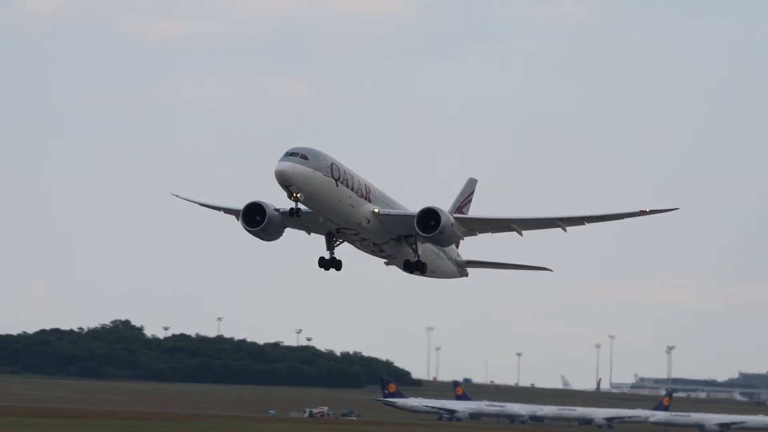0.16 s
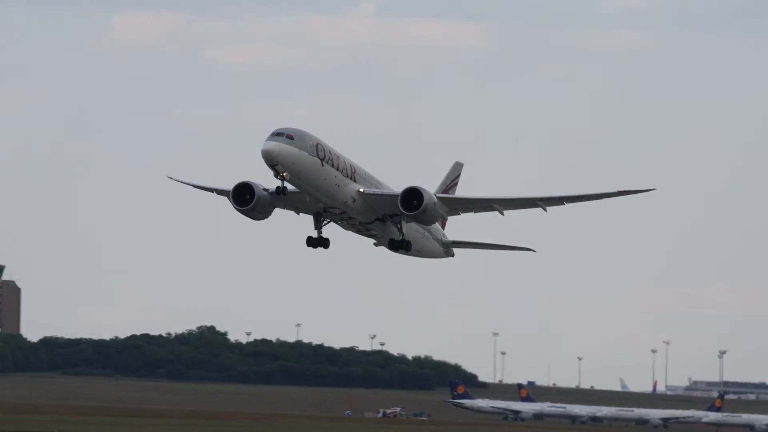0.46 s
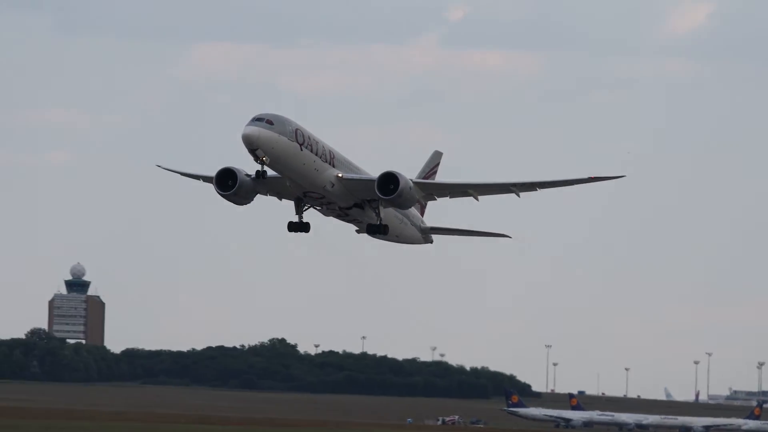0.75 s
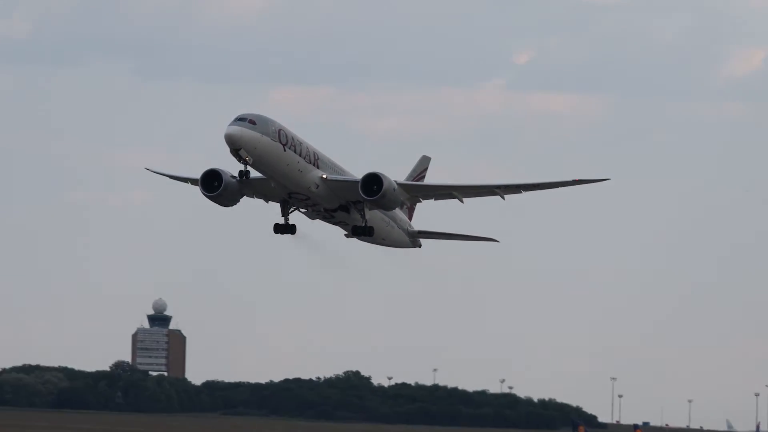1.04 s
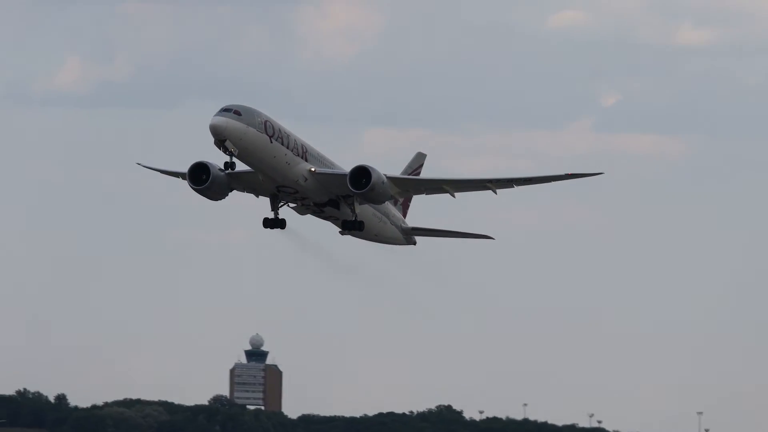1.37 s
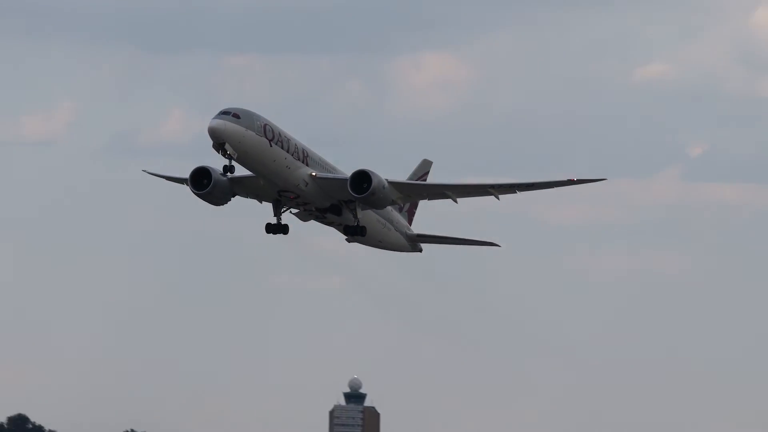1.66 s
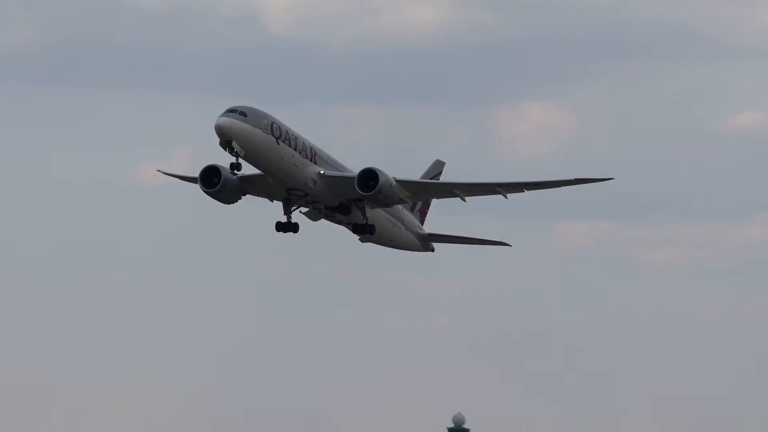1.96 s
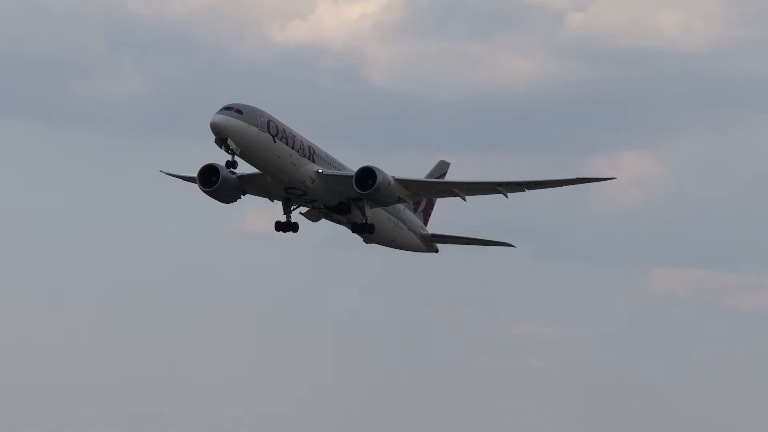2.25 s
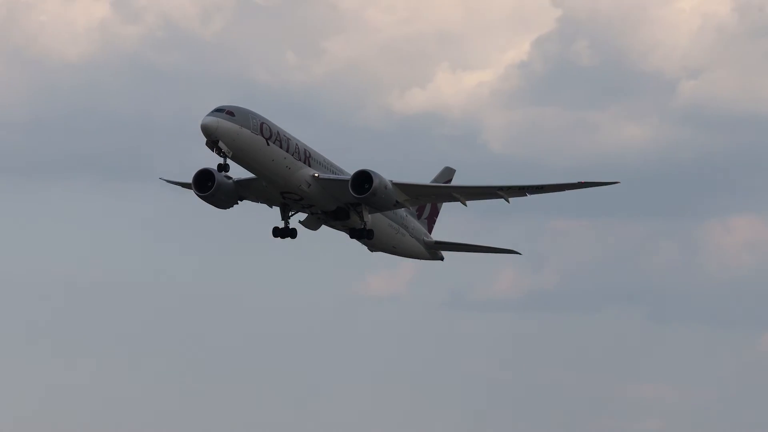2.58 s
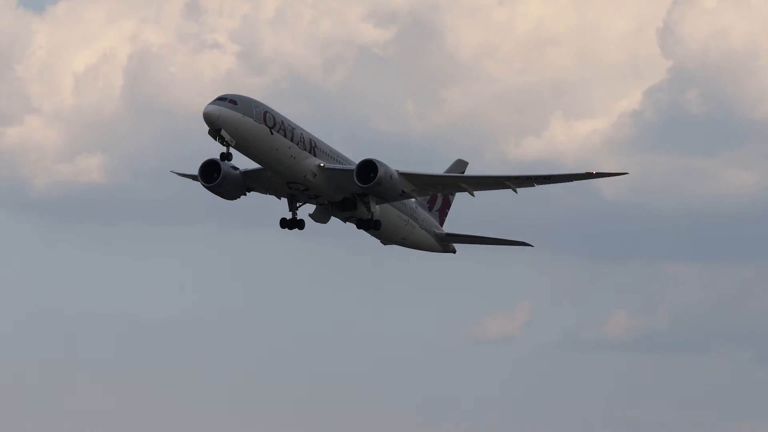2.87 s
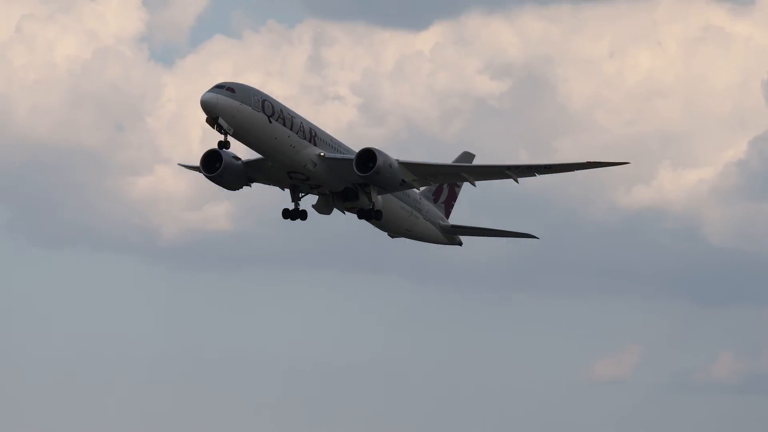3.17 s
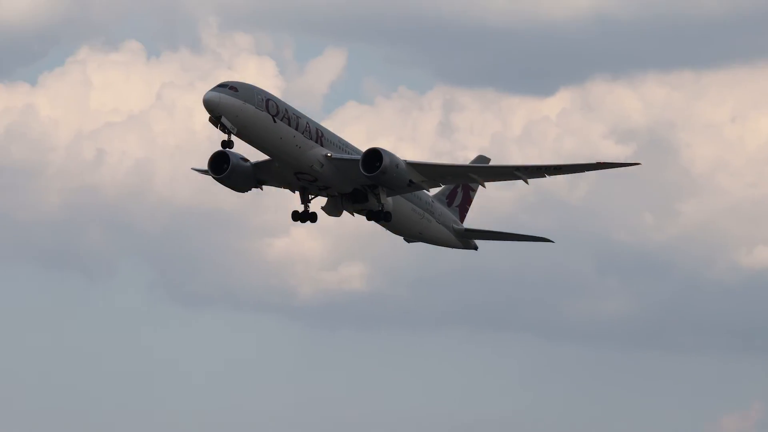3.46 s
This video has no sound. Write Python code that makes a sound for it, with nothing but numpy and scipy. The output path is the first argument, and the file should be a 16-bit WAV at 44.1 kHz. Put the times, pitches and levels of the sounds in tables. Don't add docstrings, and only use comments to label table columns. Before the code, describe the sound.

A jet airliner's deep rumble grows into a loud rushing roar and engine whine over field crickets

```python
import sys
import numpy as np
from scipy import signal
from scipy.fft import rfft, irfft
from scipy.io import wavfile

SR = 44100
rng = np.random.default_rng(int(sys.argv[2]) if len(sys.argv) > 2 else 0)


def wrap_up_sound(samples):
    columns = np.atleast_2d(samples).T
    tamed = np.clip(columns, -1, 1)
    steps = np.round(tamed * 32767).astype(np.int16)
    wavfile.write(sys.argv[1], SR, steps)


def decibels_to_gain(level_db):
    exponent = np.asarray(level_db, float) / 20
    return 10 ** exponent


N = 159642
TIME = np.arange(N) / SR
HZ = np.maximum(np.fft.rfftfreq(N, 1 / SR), 1)
SIDES = np.array([[1], [-1]])


def rms_one(x):
    return x / np.sqrt(np.mean(x ** 2) + 1e-20)


def in_time(rows):
    seconds, *columns = np.transpose(rows)
    return [np.interp(TIME, seconds, column) for column in columns]


def at_hz(points, hz, outside=None):
    f, value = np.transpose(points)
    return np.interp(np.log(hz), np.log(f), value, left=outside, right=outside)


def drift(rate):
    step = 40
    pole = np.exp(-2 * np.pi * rate * step / SR)
    noise = rng.standard_normal(N // step + 2002)
    slow = signal.lfilter([1], [1, -2 * pole, pole * pole], noise)[2000:]
    return np.interp(np.arange(N) / step, np.arange(len(slow)), rms_one(slow))


def coloured(spectrum, patchy_db, channels):
    shaped = rfft(rng.standard_normal((channels, N))) * decibels_to_gain(at_hz(spectrum, HZ, outside=-150))
    half_octave = 2 * np.log2(HZ / 16)
    first, last = [int(np.log2(spectrum[i][0] ** 2 / 256)) for i in (0, -1)]
    together = drift(2.0)
    out = 0
    for k in range(first, last + 2):
        band = np.clip(1 - abs(half_octave - k), 0, 1)
        flicker_db = patchy_db * (.5 * together + drift(2.9))
        out = out + irfft(shaped * band, N) * decibels_to_gain(flicker_db)
    return rms_one(out)


def airliner():
    return exhaust_rumble() + shaft_beat() + far_roar() + inlet_roar() + blade_tones()


# time in seconds, jet roar in dB, fan rush in dB.
INLET_SWELL = [(0, -63.5, -62), (1.2, -45.5, -52.5), (1.7, -40.5, -44), (2.1, -29.5, -38), (2.4, -30, -33),
               (2.65, -24, -27.5), (2.82, -21.5, -29.5), (2.95, -19.5, -28), (3.25, -17, -25.5),
               (3.45, -17.5, -24.5), (3.62, -20.5, -21.5)]
# frequency in Hz, density in dB per Hz.
JET_COLOUR = [(150, -11.5), (300, 4.5), (450, -3.5), (1000, -7.5), (1600, -9.5), (2500, -21), (4000, -63.5)]
# frequency in Hz, density in dB per Hz.
FAN_COLOUR = [(600, -38.5), (1200, 5), (1800, -6), (2600, -1.5), (3500, -7.5), (4300, -13.5), (5200, -23),
              (6800, -48)]


def inlet_roar():
    jet_db, rush_db = in_time(INLET_SWELL)
    jet = decibels_to_gain(jet_db) * coloured(JET_COLOUR, patchy_db=0.3, channels=2)
    rush = decibels_to_gain(rush_db) * coloured(FAN_COLOUR, patchy_db=0.3, channels=2)
    direct, scattered = jet + rush
    return microphones(direct, scattered, lag_us=47.6, echo_ms=1.88, echo_gain=.65)


# time in seconds, frequency in Hz.
BLADE_PASSING = [
    (0, 851),
    (1.7, 849),
    (2.3, 846),
    (2.7, 841),
    (3.2, 839.5),
    (3.62, 836.5),
]
# time in seconds, blade tone in dB, swell of the upper tones in dB.
TONE_SWELL = [(0, -46, -33), (.7, -43, -33), (1.3, -48, -34), (1.9, -45, -27), (2.2, -45, -17),
              (2.45, -43, -9), (2.68, -36, -10), (2.84, -35, -13), (2.93, -27, -7), (3.4, -23, 0),
              (3.62, -21, -2)]
# multiple of the blade rate, level at the loudest in dB,
# share of the swell followed, twinkle in dB.
UPPER_TONES = [(2, -28, .8, 4), (3, -36, .65, 4), (4, -39, .9, 4), (5, -46, .95, 4), (6, -66, .9, 4),
               (1.771, -32, .65, 4), (1.378, -35, .75, 4), (.757, -35, .8, 4), (.858, -38, .6, 4),
               (2.308, -43, .7, 4), (2.612, -43, .7, 4), (4.104, -48, .6, 4), (5.116, -49, .95, 4),
               (6.116, -57, 1.1, 4)]


def rotor_phase():
    return 2 * np.pi * np.cumsum(in_time(BLADE_PASSING)[0]) / SR


def blade_tones():
    turns = rotor_phase()
    blade_db, swell_db = in_time(TONE_SWELL)
    blur = 1 - .03 * swell_db
    tones = [(1, blade_db - 1, 2.8)]
    for multiple, db, share, twinkle_db in UPPER_TONES:
        tones.append((multiple, db + share * swell_db, twinkle_db))
    whine = 0
    for multiple, db, twinkle_db in tones:
        level_db = db + twinkle_db * np.sqrt(blur) * drift(4 * multiple)
        wander_rad = .36 * blur * multiple * drift(5)
        whine = whine + decibels_to_gain(level_db) * np.sqrt(2) * np.sin(multiple * turns + wander_rad)
    return microphones(whine, 0 * whine, lag_us=47.6, echo_ms=1.88, echo_gain=0)


# shaft order, level in dB.
SHAFT_ORDERS = [(1, -29.5), (2, -30), (3, -34.5), (4, -45.5)]


def shaft_beat():
    blades, fade_s = 18, 3.54
    turns = rotor_phase() / blades
    beat = 0
    for order, db in SHAFT_ORDERS:
        level = decibels_to_gain(db + 1.2 * drift(3.0)) * np.sqrt(2)
        beat = beat + level * np.sin(order * turns + 1.57 * drift(2.87))
    return beat / (1 + (TIME / fade_s) ** 8)


# time in seconds, level in dB.
RUMBLE_SWELL = [
    (0.0, -23),
    (1.3, -19),
    (1.67, -26.5),
    (1.74, -19),
    (2.71, -18),
    (3.21, -14),
    (3.25, -25),
    (3.42, -15.5),
    (3.62, -21),
]
# frequency in Hz, density in dB per Hz.
RUMBLE_COLOUR = [(11, -44), (18, -14), (43, -0.5), (86, 0), (146, -9.5), (168, -13), (240, -32),
                 (310, -57.5), (530, -120)]


def exhaust_rumble():
    level_db = in_time(RUMBLE_SWELL)[0] - 1.5
    return decibels_to_gain(level_db) * coloured(RUMBLE_COLOUR, patchy_db=0.05, channels=1)


# frequency in Hz, density in dB per Hz.
FAR_COLOUR = [(150, -14.5), (200, 1), (400, -0.5), (1100, -5.5), (2500, -12), (4000, -20), (6000, -28.5),
              (7500, -68.5)]


def far_roar():
    direct, scattered = decibels_to_gain(-34.5) * coloured(FAR_COLOUR, patchy_db=0.3, channels=2)
    return microphones(direct, scattered, lag_us=87.3, echo_ms=1.9, echo_gain=.4)


# corner in Hz, left then right; the left port faces the ground more.
ECHO_CORNER = [
    [2300],
    [900],
]
# frequency in Hz, share of power from one direction.
COHERENCE = [(150, 1.0), (400, .995), (900, .97), (1500, .95), (2500, .87), (4500, .8), (6500, .4)]
# frequency in Hz, left minus right in dB.
SHADOW = [(150, 5.5), (280, -1.5), (800, -3.5), (1200, -3.5), (1500, -2.5), (2100, -9.5), (3400, -4.5),
          (6000, -8)]


def microphones(direct, scattered, lag_us, echo_ms, echo_gain):
    delayed = np.exp(-2j * np.pi * HZ * echo_ms / 1000)
    echo = 1 + echo_gain / (1 + (HZ / ECHO_CORNER) ** 2) * delayed
    lag_s = lag_us * 1e-6 * SIDES * np.clip(np.log2(HZ / 120), 0, 1)
    lag = np.exp(-1j * np.pi * HZ * lag_s)
    alike = np.clip(at_hz(COHERENCE, HZ), 0, 1)
    both = np.sqrt(alike) * rfft(direct) * echo * lag
    both = both + np.sqrt(1 - alike) * rfft(scattered) * SIDES
    return irfft(both * decibels_to_gain(SIDES * at_hz(SHADOW, HZ) / 2), N)


def cricket(chirps, wing_hz, pan_db, count):
    pulse_s, gap_s, sag_hz = .022, .0325, 330
    t = np.arange(int(pulse_s * SR)) / SR
    phase = 2 * np.pi * np.cumsum(wing_hz - sag_hz * (t / pulse_s - .5)) / SR
    near = decibels_to_gain(np.minimum([[pan_db], [-pan_db]], 0))
    overtone = decibels_to_gain(-24) * np.sin(2 * phase) * SIDES
    stroke = np.hanning(len(t)) * (near * np.sin(phase) + overtone)
    out = np.zeros((2, N + 2 * SR))
    uneven_db = rng.normal(0, 0.5, (len(chirps), count + 1))
    for (s, db), uneven in zip(chirps, uneven_db):
        for k in range(-1, count):
            i = SR + int((s + k * gap_s - pulse_s / 2) * SR)
            out[:, i:i + len(t)] += decibels_to_gain(db + 3.5 + uneven[k] - 6.5 * (k < 0)) * stroke
    return out[:, SR:SR + N]


# start in seconds, level in dB.
LEFT_CHIRPS = [(.003, -54), (.172, -52), (.28, -57), (.524, -57), (.672, -54), (.888, -55), (1.103, -50),
               (1.308, -50), (1.535, -49), (1.741, -48), (1.958, -49), (2.174, -49), (2.374, -48),
               (2.585, -49), (2.809, -49), (3.051, -49), (3.27, -51), (3.49, -51)]
# start in seconds, level in dB.
RIGHT_CHIRPS = [(.173, -49), (.419, -50), (.648, -50), (.868, -49), (1.089, -50), (1.304, -49),
                (1.528, -48), (1.746, -49), (1.974, -49), (2.216, -49), (2.433, -50), (2.656, -50),
                (2.88, -50), (3.1, -51), (3.33, -51), (3.55, -51)]


def crickets():
    left = cricket(LEFT_CHIRPS, wing_hz=4760, pan_db=9, count=3)
    right = cricket(RIGHT_CHIRPS, wing_hz=4800, pan_db=-8, count=2)
    return left + right


def bird_chip():
    start_s, length_s, from_hz, to_hz = 1.009, .0075, 4200, 6400
    u = np.clip((TIME - start_s) / length_s, 0, 1)
    phase = 2 * np.pi * np.cumsum(from_hz + (to_hz - from_hz) * u ** 2) / SR
    return decibels_to_gain(-36) * np.sin(np.pi * u) ** .5 * np.sin(phase) * [[1], [-.9]]


def insect_trill():
    start_s, length_s, centre_hz, width_hz = .27, .38, 7160, 450
    v = np.clip((TIME - start_s) / length_s, 0, 1)
    band = np.exp(-((HZ - centre_hz) / width_hz * 2) ** 2)
    buzz = rms_one(irfft(rfft(rng.standard_normal(N)) * band, N))
    return decibels_to_gain(-60) * np.sin(np.pi * v) ** .7 * buzz * [[-.3], [1]]


# frequency in Hz, density in dB per Hz.
HISS_COLOUR = [(4500, -31.5), (5800, -1.5), (7000, -5.5), (8000, -3.5), (10000, 0), (11200, -4.5),
               (13000, 0.5), (15000, -13)]


def microphone_hiss():
    level_db = -59 - 3 * TIME
    side, mid = coloured(HISS_COLOUR, patchy_db=.8, channels=2) * decibels_to_gain(level_db)
    return side * SIDES + decibels_to_gain(-5.5) * mid


def scene():
    return airliner() + crickets() + bird_chip() + insect_trill()


def low_pass(x):
    return signal.sosfilt(signal.butter(12, 14900, fs=SR, output="sos"), x)


def record(dry):
    top = 1.64
    mix = top * np.tanh(dry / top) + microphone_hiss()
    return low_pass(mix)


dry = scene()
out = record(dry)
wrap_up_sound(out)
```